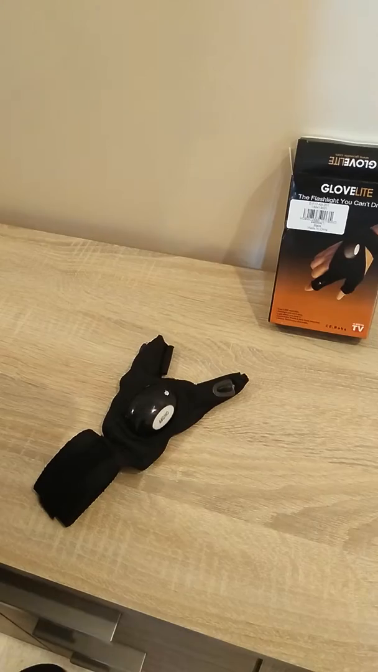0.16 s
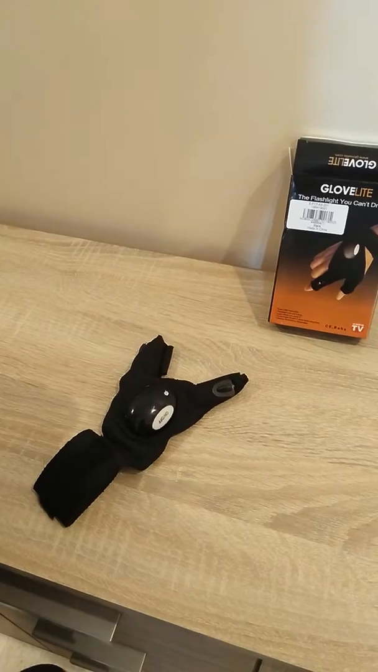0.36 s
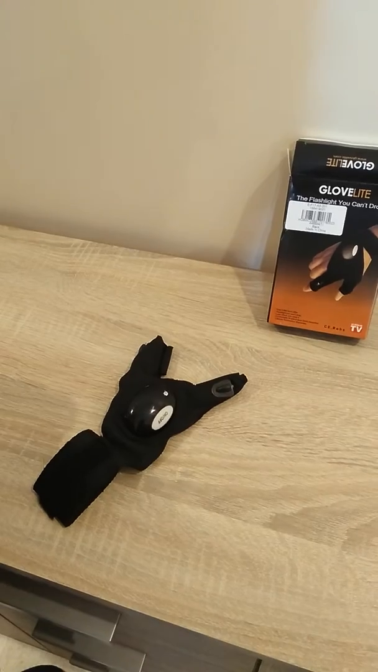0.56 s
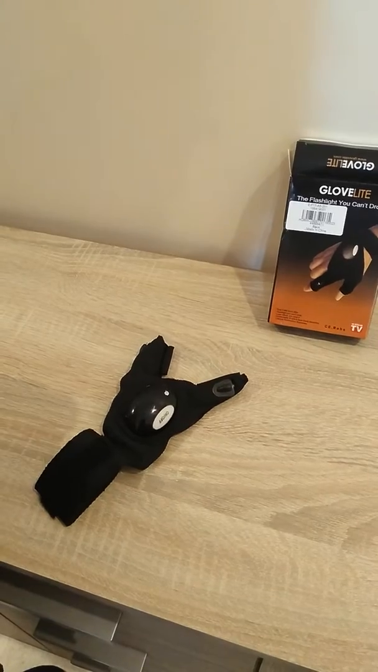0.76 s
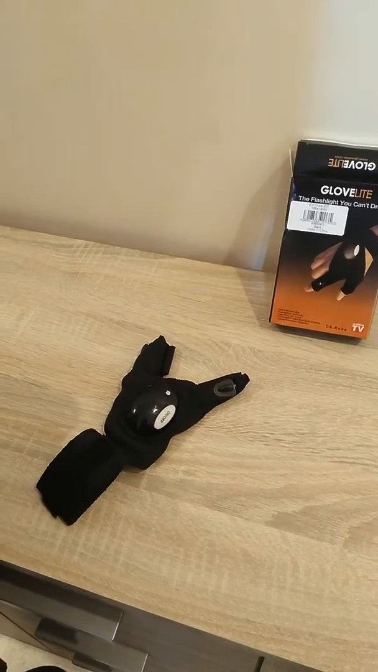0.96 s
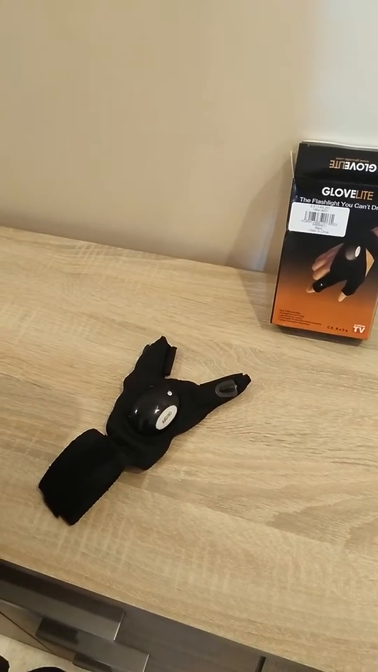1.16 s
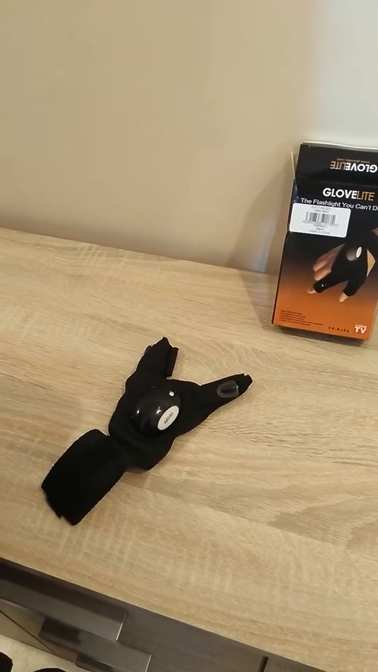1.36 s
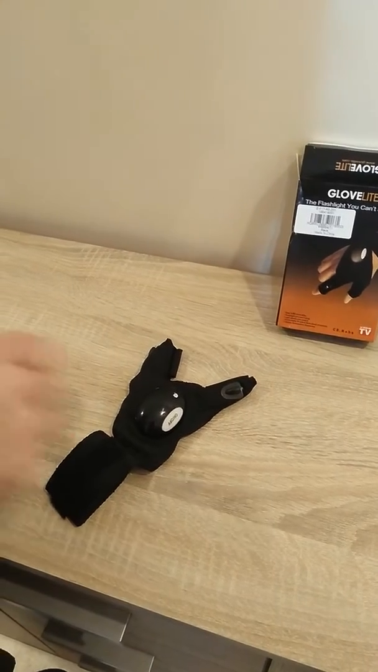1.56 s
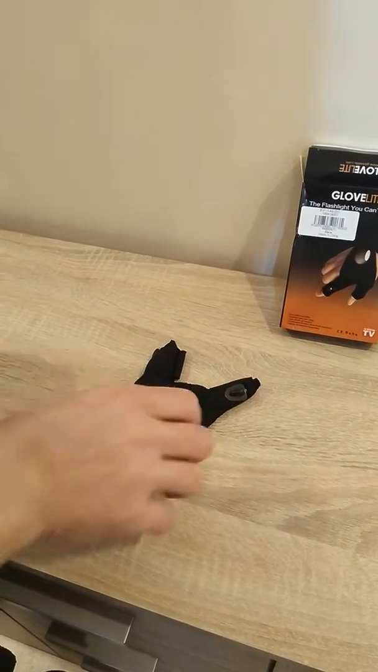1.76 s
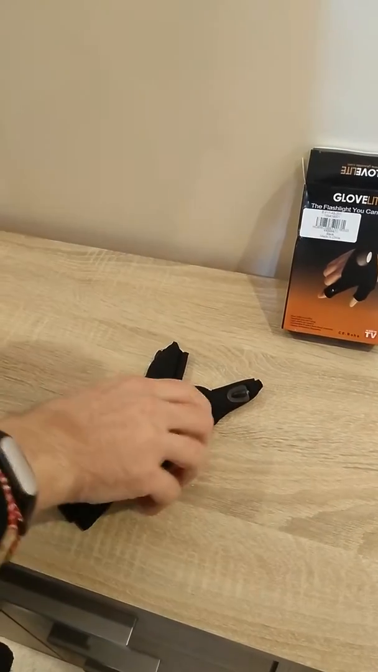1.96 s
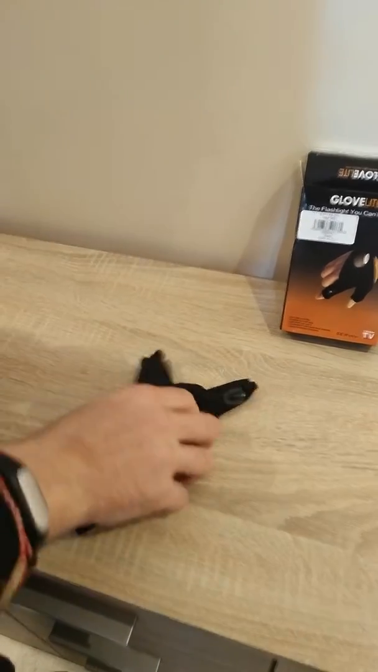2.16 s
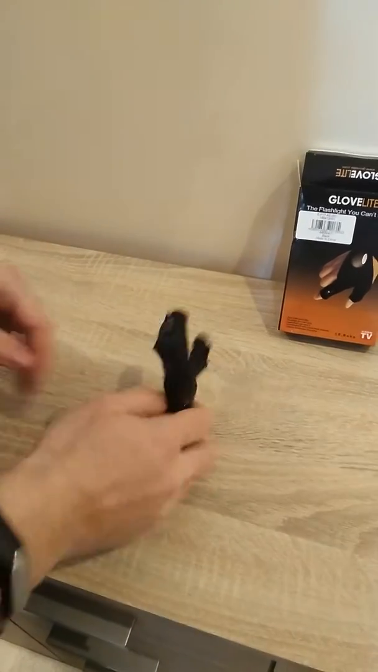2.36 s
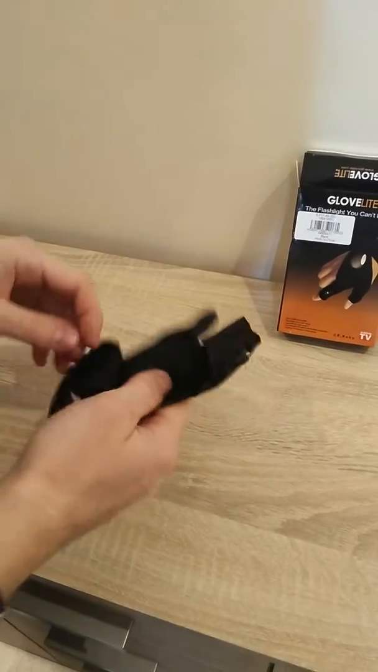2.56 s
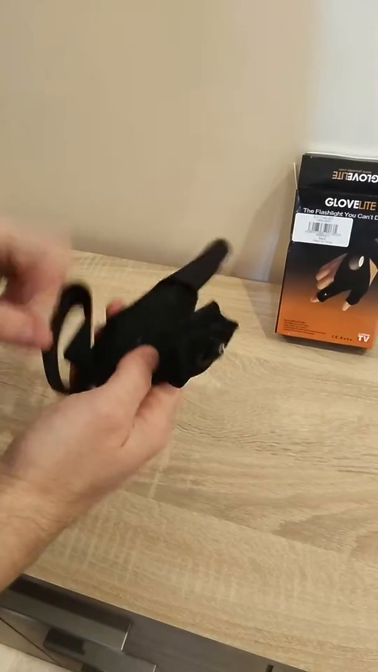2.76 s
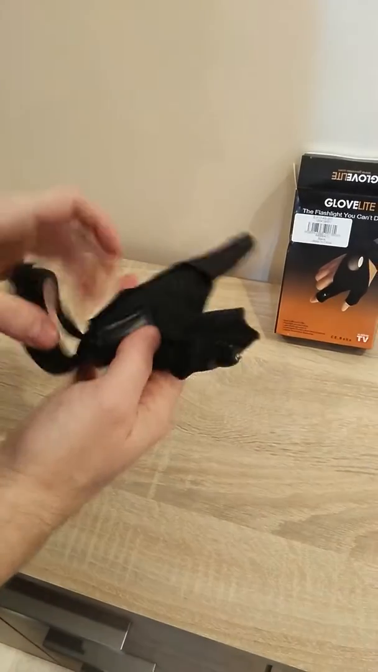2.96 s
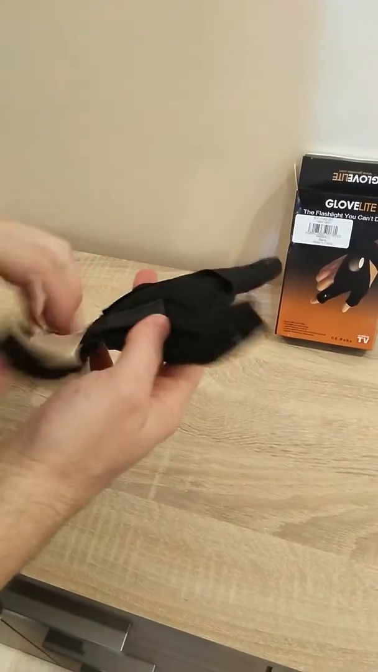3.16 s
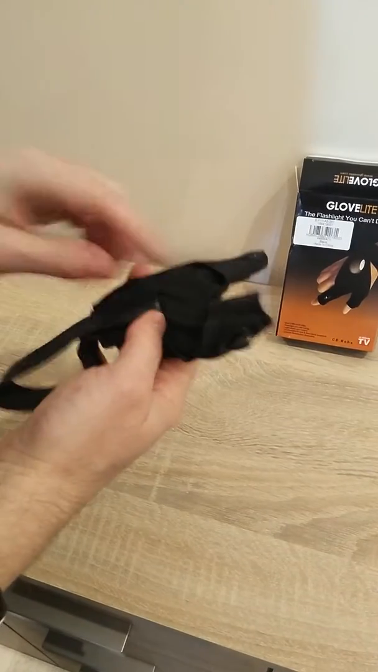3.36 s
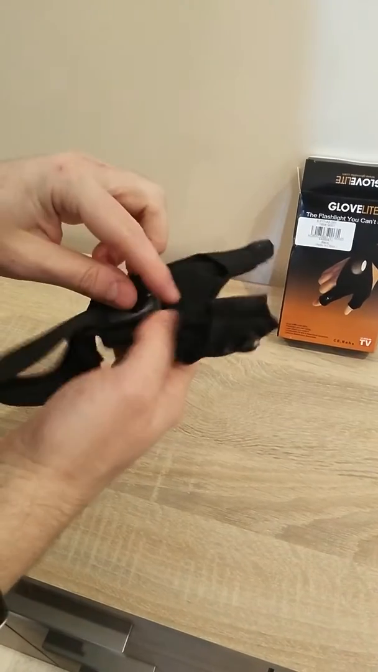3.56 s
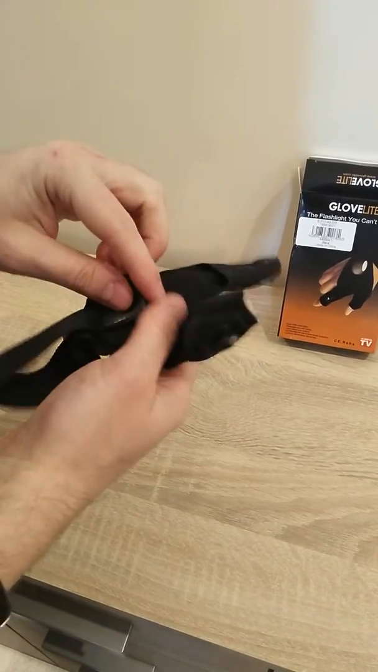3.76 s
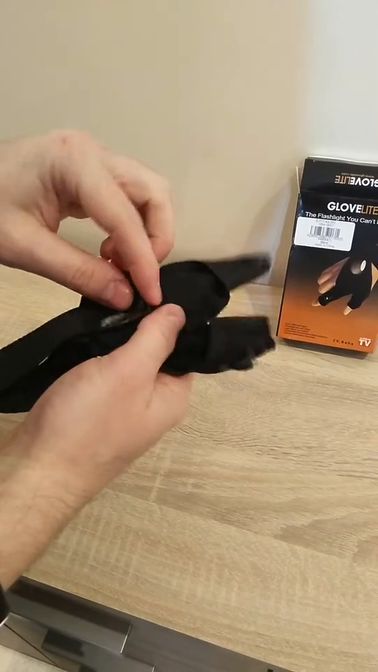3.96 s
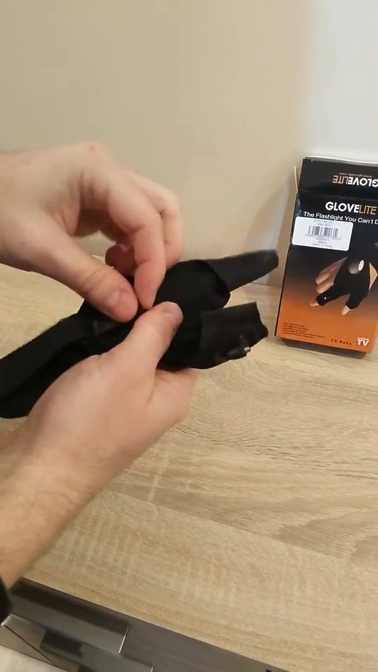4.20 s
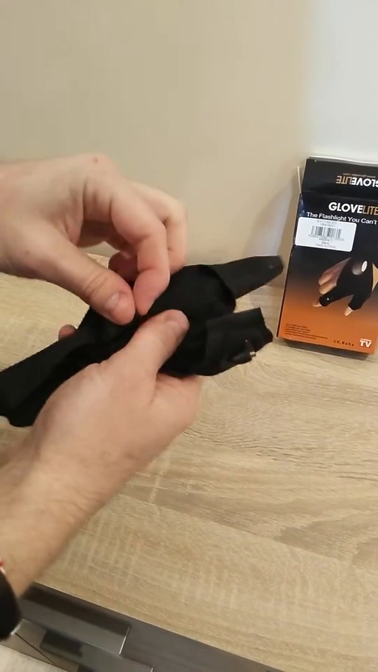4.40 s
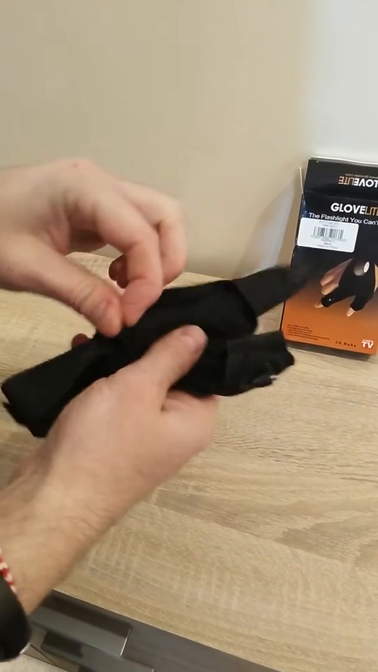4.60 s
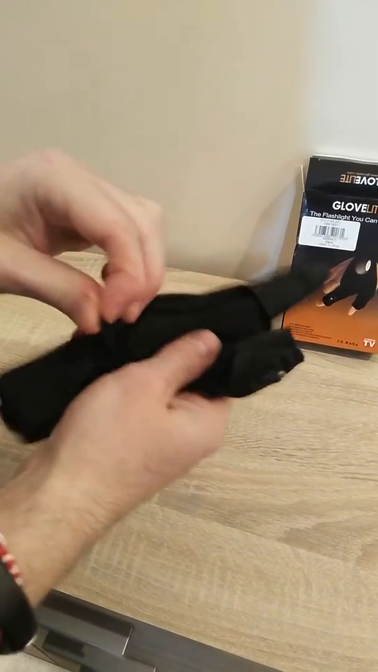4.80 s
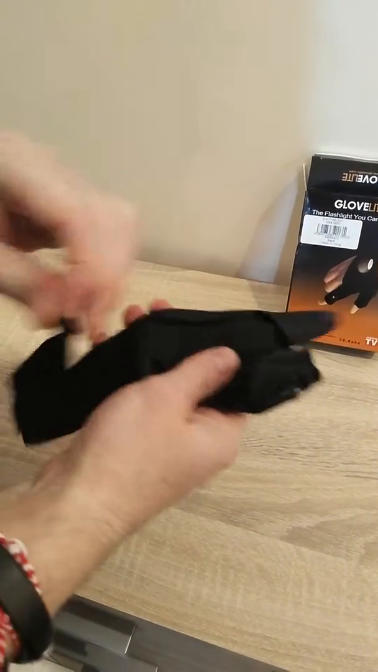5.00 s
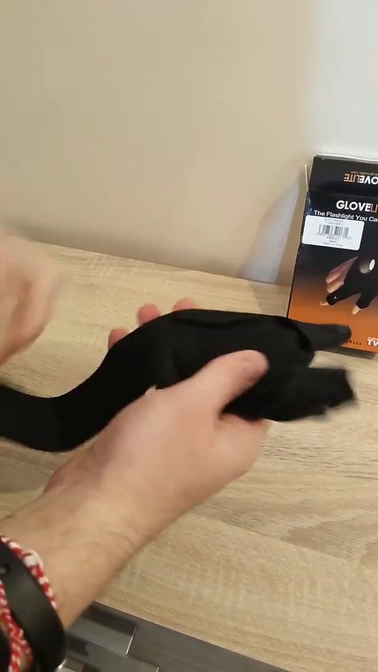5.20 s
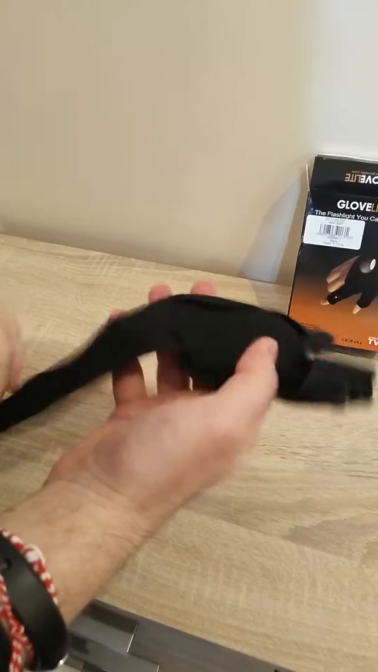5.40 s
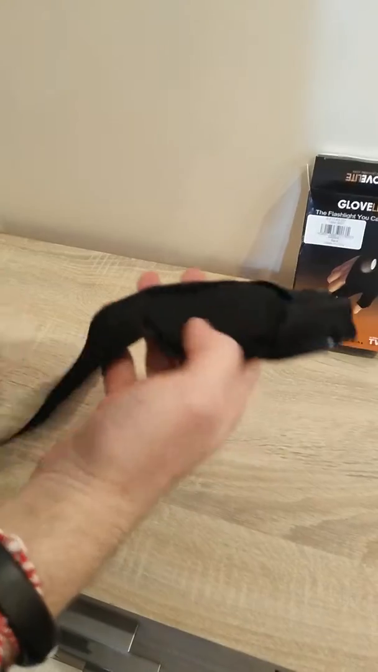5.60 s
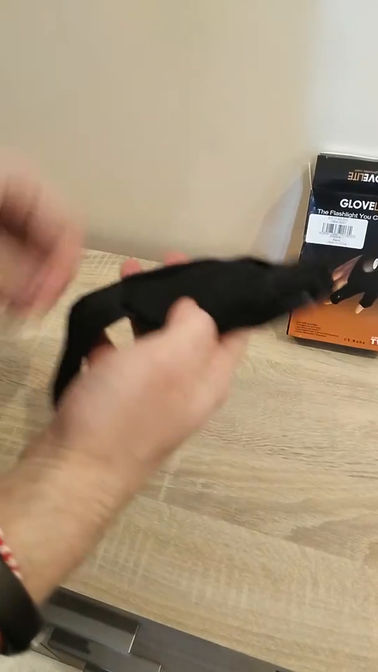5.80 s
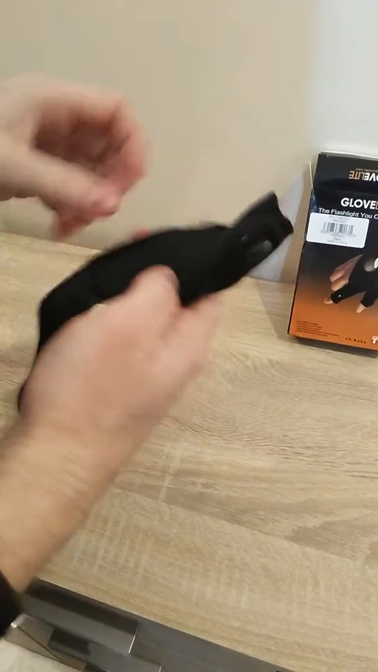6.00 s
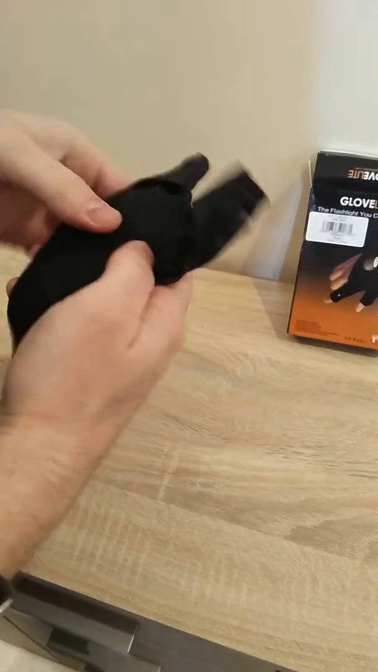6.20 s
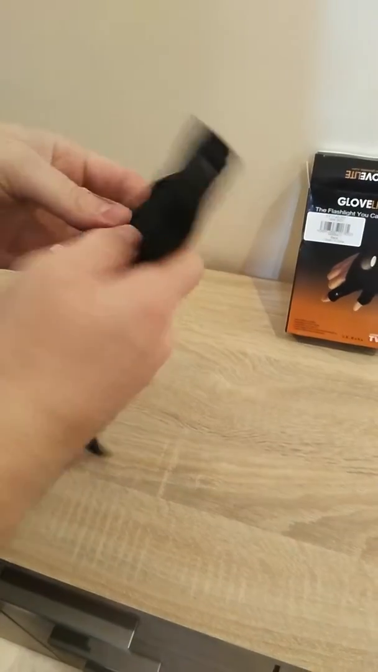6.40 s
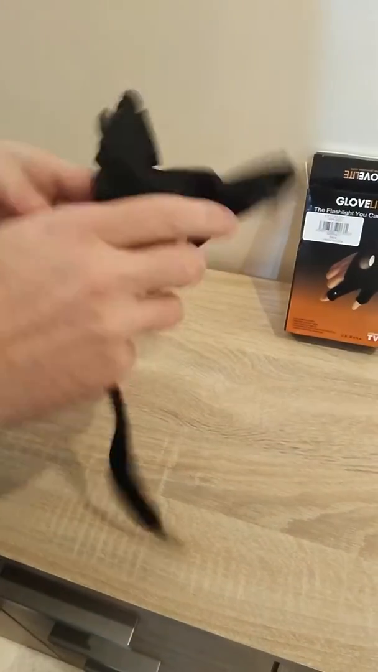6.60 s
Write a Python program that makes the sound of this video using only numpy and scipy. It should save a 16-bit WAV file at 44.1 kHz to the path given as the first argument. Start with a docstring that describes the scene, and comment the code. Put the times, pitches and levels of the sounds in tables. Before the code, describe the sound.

A quiet small room has faint air noise and a low, wavering hum throughout. It opens with a soft fabric swish and a few dull, low handling thuds. Around 1 second come three light, hard taps, the middle one sharpest. A small click at 1.7 seconds and a soft bump on a wooden desk at 2 seconds lead into gentle rustling and finger rubbing as a cloth glove is handled close by. Near 3.8 seconds its hook-and-loop strap gives a few tiny ticks. From about 4.4 to 4.9 seconds the strap peels open in three quick, bright, crackling rasps, at roughly 4.5, 4.7 and 4.9 seconds. These are by far the loudest sounds and carry a slight room echo. Faint rustling continues, with another soft desk bump near 5.7 seconds and a small crisp tick at about 6.6 seconds.

```python
"""A wooden desk in a small room: a fabric glove is picked up and its hook-and-loop strap is peeled open
in three short rasps. Each hook that lets go snaps the stiff tape; desk top and walls echo it.
Around that, cloth rustles, fingers thud, hard taps sound, the hand bumps the desk,
and a low hum wavers under the room air."""
import sys
import numpy as np
from scipy import signal
from scipy.fft import rfft, irfft, next_fast_len
from scipy.io import wavfile
from scipy.ndimage import uniform_filter1d

SR = 44100
rng = np.random.default_rng(int(sys.argv[2]) if len(sys.argv) > 2 else 0)


def store_wav(level_fs):
    """Save 16-bit WAV to argv[1]."""
    pcm = np.round(np.clip(np.atleast_2d(level_fs), -1, 1) * 32767)
    wavfile.write(sys.argv[1], SR, pcm.T.astype(np.int16))


N = 293132
TIME = np.arange(N) / SR

# spectrum of the tape's snap: (frequency [Hz], gain [dB])
TAPE_SPECTRUM = [(200, -22), (1100, -28.5), (2100, -32.5), (2900, -16.5), (4050, -2.5), (5200, -8.5),
                 (6600, 0), (8300, -10), (9300, 3.5), (10400, 2.5), (11400, -7.5), (13400, -6), (14600, -8),
                 (15800, -14)]
# pulls on the strap: (peak [s], build [s], release [s], small hooks [dB], crackle [dB])
STRAP_PULLS = [(4.487, 0.034, .01, -44, -57.5), (4.537, .019, .026, -27, -33),
               (4.714, 0.022, .04, -37.5, -40.5), (4.867, .017, 0.026, -35, -49.5)]


def undb(db):
    """Decibels to gain."""
    return 10 ** (np.asarray(db) / 20)


def unit(x):
    """Scale to rms 1."""
    return x / np.sqrt(np.mean(x ** 2))


def response(points, freqs_hz):
    """Gain from (frequency [Hz], gain [dB]) points; rolls off below the first."""
    hz, db = np.transpose(points)
    return undb(np.interp(np.log(freqs_hz + 1), np.log(hz), db)) * np.minimum(freqs_hz / hz[0], 1) ** 2


def colour(x, points):
    """Shape x by a spectrum; rms 1."""
    size = next_fast_len(len(x))
    gain = response(points, np.fft.rfftfreq(size, 1 / SR))
    return unit(irfft(rfft(x, size) * gain, size)[:len(x)])


def walk(rate_hz):
    """Smooth random wander; rms 1."""
    hold = int(SR / rate_hz)
    steps = np.repeat(rng.standard_normal(N // hold + 1), hold)
    return unit(uniform_filter1d(steps, hold)[:N])


def add(out, at_s, x):
    """Mix x into out."""
    i = int(at_s * SR)
    out[i:i + len(x)] += x[:N - i]


def grains(rate_hz, spread_db):
    """Random clicks with log-normal size scatter."""
    hits = rng.random(N) < rate_hz / SR
    return hits * rng.standard_normal(N) * undb(spread_db * rng.standard_normal(N))


def ring(modes, rise_s):
    """Damped modes building up during a contact."""
    t = TIME[:SR // 2]
    body = sum(undb(db) * np.sin(2 * np.pi * hz * t) * np.exp(-np.log(1000) * t / t60_s)
               for hz, db, t60_s in modes)
    return body * (1 - np.exp(-(t / rise_s) ** 2))


def effort(t, peak_s, build_s, release_s):
    """Hand movement: exponential rise to 1, then decay."""
    return np.exp(np.minimum((t - peak_s) / build_s, (peak_s - t) / release_s))


def background(air_db=-64, rumble_db=-4, hum_hz=48.4, hum_db=-2, rest_db=-61):
    """Room air, plus rumble and wavering hum that swell as the hands move."""
    # noise spectra: (frequency [Hz], gain [dB])
    air_spectrum = [(65, -41.5), (110, -0.5), (223, -11), (311, -4), (360, -10), (399, -12), (861, -14),
                    (1130, -17), (2100, -29.5), (2540, -28.5), (3470, -34), (4180, -43), (15800, -44.5)]
    rumble_spectrum = [(18, -24.5), (32, -14.5), (46, 8.5), (62, -16), (78, -4.5), (96, -1.5), (130, -15.5),
                       (220, -43.5)]
    # low swells: (centre [s], half width [s], level [dB])
    swells = [(.2, 0.086, -45), (.38, 0.041, -49.5), (1.07, 0.035, -51.5), (1.53, 0.11, -51.5),
              (1.99, 0.093, -49.5), (2.35, 0.024, -50.5), (2.68, 0.11, -51), (3.14, 0.13, -52),
              (3.92, 0.087, -48.5), (4.33, .05, -52.5), (4.65, .22, -54.5), (5.821, 0.24, -57),
              (6.43, .14, -52)]
    air = colour(rng.standard_normal(N), air_spectrum) * undb(air_db + 0.5 * walk(5.2))
    pitch_hz = hum_hz + 1.08 * walk(5.5)
    hum = unit(np.sin(2 * np.pi * np.cumsum(pitch_hz) / SR)) * undb(hum_db + 0.6 * walk(5))
    rumble = undb(rumble_db) * colour(rng.standard_normal(N), rumble_spectrum)
    power = sum(undb(db) ** 2 * np.exp(-((TIME - at_s) / width_s) ** 2) for at_s, width_s, db in swells)
    return air + (hum + rumble) * np.sqrt(undb(rest_db) ** 2 + power)


def cloth(gain_db=-1, fibre_db=-8, flutter_db=0.93, rest_db=-73):
    """Sliding fabric hisses with each stroke; fibres catch at random."""
    # friction spectrum: (frequency [Hz], gain [dB])
    spectrum = [(300, -14.5), (1200, -11.5), (1800, -11), (2800, -15.5), (4100, -14.5), (5200, -16),
                (6050, -11.5), (7300, -4), (9300, 2), (10500, 0), (11600, -4.5), (15800, -10.5)]
    # hand strokes over the glove: (peak [s], build [s], release [s], level [dB])
    strokes = [(.09, 0.15, 0.084, -47.5), (1.04, .13, 0.18, -59.5), (1.36, .08, .12, -58),
               (1.75, .13, 0.51, -51), (2.05, .22, 0.068, -52), (2.53, .2, 0.62, -51.5),
               (3.5, .14, 0.066, -50.5), (3.86, .2, 0.2, -56.5), (4.159, .02, .09, -55), (4.4, .1, .3, -56),
               (5.08, .3, 0.21, -57), (5.559, .003, 0.11, -56.5), (5.79, .025, 0.18, -56),
               (6.6, .24, 0.15, -55)]
    friction = rng.standard_normal(N) + undb(fibre_db) * unit(grains(rate_hz=700, spread_db=5))
    power = sum((undb(db) * effort(TIME, *timing)) ** 2 for *timing, db in strokes)
    envelope = np.sqrt(undb(rest_db) ** 2 + power)
    return colour(friction, spectrum) * envelope * undb(gain_db + flutter_db * walk(25))


def rubs(q=16, flutter_db=3):
    """Fingers on fabric: dense tiny slips ring one resonance per rub."""
    # rubs: (start [s], length [s], resonance [Hz], level [dB])
    strokes = [(0, 0.2, 1780, -72), (1.654, 0.53, 1950, -76), (1.922, 0.19, 4230, -72),
               (2.201, 0.5, 826, -65.5), (2.38, 0.4, 4030, -72), (2.479, 0.21, 1760, -75),
               (2.68, 0.19, 1070, -72.5), (3.738, 0.43, 1070, -71)]
    out = np.zeros(N)
    for at_s, length_s, hz, db in strokes:
        slips = grains(rate_hz=2500, spread_db=2.5)
        resonance = unit(signal.lfilter(*signal.iirpeak(hz, q, fs=SR), slips))
        rub = resonance * undb(db + flutter_db * walk(26.1))
        fade = signal.windows.tukey(int(length_s * SR), .5)
        add(out, at_s, rub[:len(fade)] * fade)
    return out


def thuds(t60_s=0.19):
    """Fingers shifting grip give low, damped thuds."""
    # grip shifts: (time [s], level [dB], pitch [Hz])
    grips = [(.365, -42, 40.7), (0.755, -42.5, 95.3), (0.969, -39.5, 70), (2.67, -41, 72.5),
             (3.135, -47.5, 99), (4.307, -46.5, 76)]
    out = np.zeros(N)
    for at_s, db, hz in grips:
        add(out, at_s, ring([(hz, db, t60_s)], rise_s=0.0021))
    return out


def taps(bright_above_hz=2000):
    """Hard contacts, as of plastic on wood, ring high and short."""
    # contacts: (time [s], level [dB], upper-mode gain [dB])
    contacts = [(0.965, -33, -20), (1.0504, -24, 3), (1.209, -37.5, -22), (1.222, -54.5, -1)]
    # modes of the tapped object: (frequency [Hz], level [dB], t60 [s])
    object_modes = [(64.6, -22, 0.25), (583, -18, 0.032), (1063, -4.5, 0.015), (1270, -5, 0.0072),
                    (2840, 10, 0.0069), (3100, 4, 0.013), (3470, -17.5, 0.043), (7700, -24, 0.022),
                    (9960, -12, 0.017)]
    out = np.zeros(N)
    for at_s, db, bright_db in contacts:
        modes = [(hz, mode_db + bright_db * (hz > bright_above_hz), t60_s)
                 for hz, mode_db, t60_s in object_modes]
        add(out, at_s, undb(db) * ring(modes, rise_s=0.0012))
    return out


def snap(body_db, top_db, crack_s=0.00029, rattle_s=0.0042, rattle_db=-21, body_s=0.0027, lag_s=.0022):
    """One hook lets go: bright crack, faint trailing rattle, short lower ring of the tape body."""
    size = 2048
    t, hz = TIME[:size], np.fft.rfftfreq(size, 1 / SR)
    crack = t / crack_s * np.exp(-t / crack_s) + undb(rattle_db) * np.exp(-t / rattle_s)
    bursts = np.array([np.exp(-t / body_s), crack, crack]) * np.sign(rng.standard_normal((3, size)))
    # low bending waves travel slower: downward chirp
    delay_s = lag_s * (np.sqrt(3000 / np.maximum(hz, 3000)) - np.sqrt(3000 / SR * 2))
    tape = response(TAPE_SPECTRUM, hz) * np.exp(-2j * np.pi * np.cumsum(delay_s) * SR / size)
    # hook position sets the shares of body, middle and top
    body = np.interp(hz, [5500, 8000], [1, 0])
    top = np.interp(hz, [10800, 12400], [0, 1])
    bands = irfft(rfft(bursts) * tape * np.array([body, 1 - body - top, top]))[:, :size // 2]
    energy = np.sum(bands ** 2, axis=1, keepdims=True) / (SR / 1000)
    return undb([body_db, 0, top_db]) @ (bands / np.sqrt(energy))


def strap(lead_s=.0005):
    """Strong hook snaps over small ones and the crackle of the peeling edge."""
    # strong hooks letting go or catching cloth:
    # (time [s], mid level [dB], body re mid [dB], top re mid [dB])
    hooks = [(1.7169, -30, -10.5, -14), (3.7952, -40.5, -35, -6), (3.845, -39, -24, -6),
             (3.8537, -39, -27, 5), (3.8714, -34, -18.5, -2), (4.3646, -40.5, -32, -6.5),
             (4.3914, -32.5, -33, -2.5), (4.4455, -27, -13, 4), (4.4708, -32, -15.5, 5.5),
             (4.476, -27.5, -18.5, -1.5), (4.502, -25.5, -4, 8.5), (4.506, -20.5, -13.5, 3),
             (4.5204, -23, -10, -4), (4.524, -14, -6, 1.5), (4.5302, -20.5, -3.5, 1.5),
             (4.5372, -8, -17.5, -13), (4.546, -21, -15, 6), (4.5496, -19.5, -6.5, -12),
             (4.5806, -22.5, -13.5, -7.5), (4.5839, -25, -10.5, 6.5), (4.6698, -36.5, -15, -1),
             (4.685, -31, -20, -5), (4.701, -14.5, -10, -1.5), (4.7043, -21.5, 5, 9.5),
             (4.7281, -25, -20.5, 1.5), (4.7415, -16.5, -8, 3), (4.8337, -33, -23, 4),
             (4.8617, -10.5, -10, 0.5), (4.8633, -10.5, -14, -14), (4.896, -23, -15, 2.5),
             (5.5568, -54, -20, -1), (5.7836, -43, -24, 1), (6.5159, -43.5, -23, -4),
             (6.632, -31, -10.5, -9)]
    out = np.zeros(N)
    for at_s, db, body_db, top_db in hooks:
        add(out, at_s - lead_s, undb(db) * snap(body_db, top_db))
    peeling = sum(undb(db) * effort(TIME, *timing) for *timing, _, db in STRAP_PULLS)
    crackle = colour(grains(rate_hz=2000, spread_db=2.5), TAPE_SPECTRUM)
    return out + small_hooks() + peeling * crackle


def bumps():
    """Hand and glove softly ring the desk panel."""
    # soft contacts: (time [s], level [dB])
    contacts = [(2.05, -30), (2.0622, -35), (5.7397, -28.5), (5.778, -41.5)]
    # panel modes: (frequency [Hz], level [dB], t60 [s])
    desk_modes = [(116, -30, 0.077), (185, -8, 0.094), (238.7, 5, 0.05), (263, 0, 0.063),
                  (584, -14.5, 0.037), (789, -10, 0.037), (989, -10.5, 0.031), (1146, -23.5, 0.096)]
    out = np.zeros(N)
    for at_s, db in contacts:
        add(out, at_s, undb(db) * ring(desk_modes, rise_s=0.0062))
    return out


def small_hooks(per_pull=10, time_stretch=1.3, effort_exponent=0.32, scatter_db=1.5, body_db=-11):
    """Hook rows give way at uneven steps, louder where the pull is hardest."""
    out = np.zeros(N)
    for peak_s, build_s, release_s, db, _ in STRAP_PULLS:
        progress = (np.arange(per_pull) + rng.random(per_pull)) / per_pull
        for at_s in peak_s + time_stretch * (progress * (build_s + release_s) - build_s):
            size_db, body_shift_db, top_db = scatter_db * rng.standard_normal(3)
            gain = undb(db + size_db) * effort(at_s, peak_s, build_s, release_s) ** effort_exponent
            add(out, at_s, gain * snap(body_db + body_shift_db, top_db))
    return out


def room(x, high_db, low_db, echo_db, high_t60_s=0.29, low_t60_s=0.44, split_hz=1600, echo_s=0.0083):
    """One desk-top echo, then a diffuse wall tail whose lows last longer."""
    t = TIME[:SR // 2]
    impulse = np.zeros(len(t))
    for kind, db, t60_s in (("high", high_db, high_t60_s), ("low", low_db, low_t60_s)):
        tail = rng.standard_normal(len(t)) * np.exp(-np.log(1000) * t / t60_s) * (t > echo_s)
        band = signal.butter(4, split_hz, kind, fs=SR, output="sos")
        impulse += undb(db) * signal.sosfilt(band, tail / np.sqrt(np.sum(tail ** 2)))
    impulse[0] += 1
    impulse[int(echo_s * SR)] += undb(echo_db)
    return signal.fftconvolve(x, impulse)[:N]


def scene():
    """Mono mix: glove close by, taps with more low reverb, thuds and background dry."""
    glove = room(strap() + cloth() + rubs() + bumps(), high_db=-17.5, low_db=-6.5, echo_db=-15)
    tapping = room(taps(), high_db=-19.5, low_db=-2.5, echo_db=-21)
    return (glove + tapping + thuds() + background())[None]


def record(dry, ceiling=.85, cutoff_hz=15900):
    """Clip the highest peaks, then low-pass."""
    lowpass = signal.ellip(10, .2, 70, cutoff_hz, fs=SR, output="sos")
    return signal.sosfilt(lowpass, np.clip(dry, -ceiling, ceiling))


dry = scene()
out = record(dry)
store_wav(out)
```